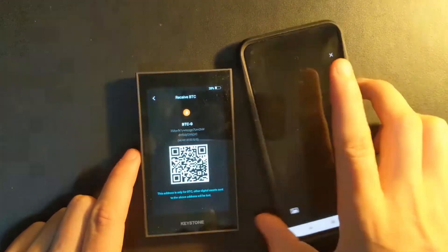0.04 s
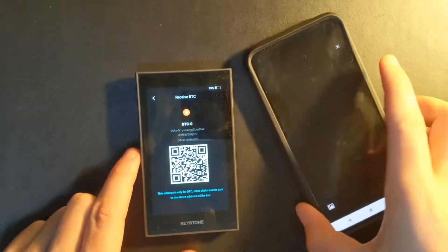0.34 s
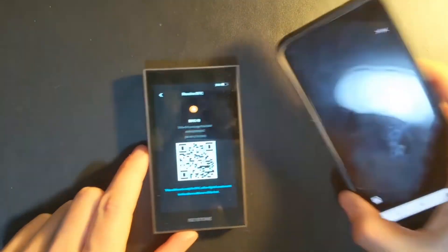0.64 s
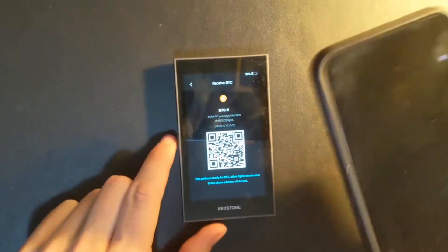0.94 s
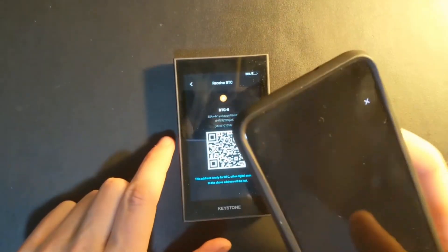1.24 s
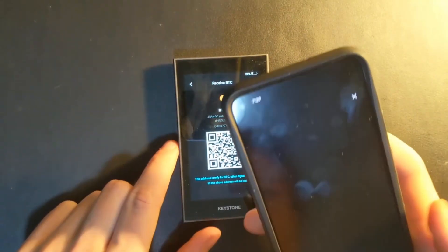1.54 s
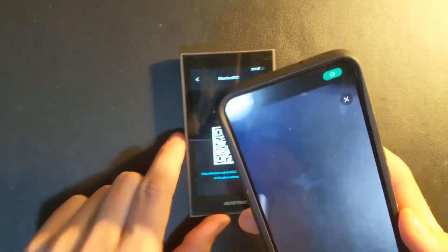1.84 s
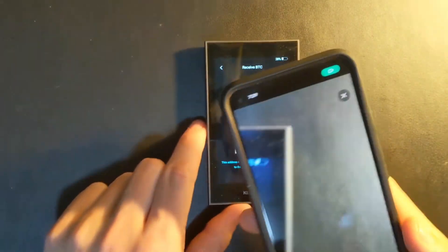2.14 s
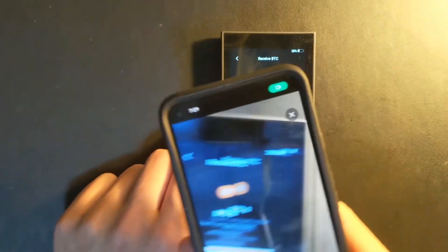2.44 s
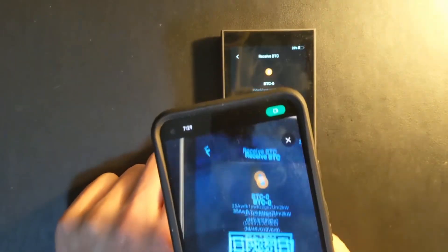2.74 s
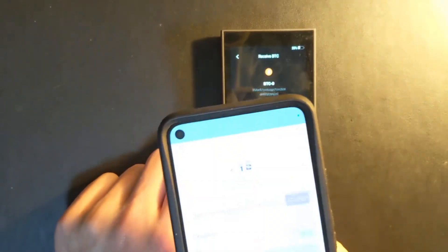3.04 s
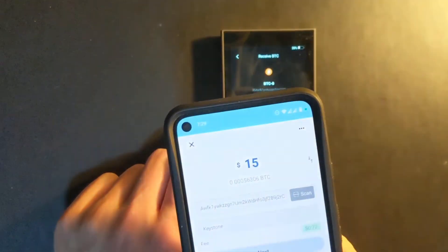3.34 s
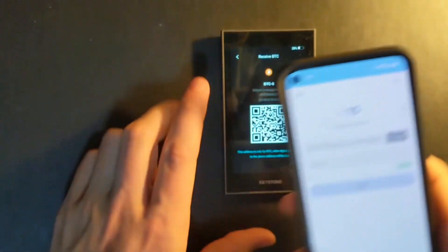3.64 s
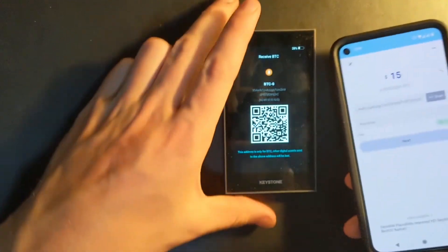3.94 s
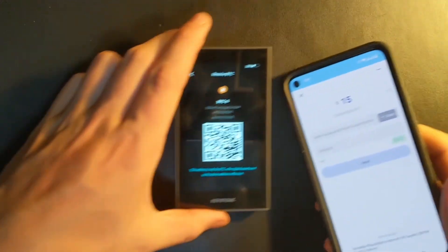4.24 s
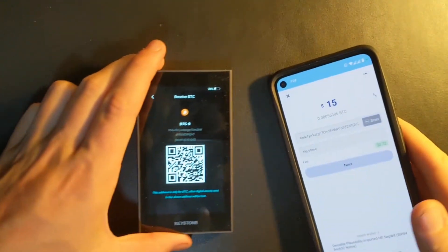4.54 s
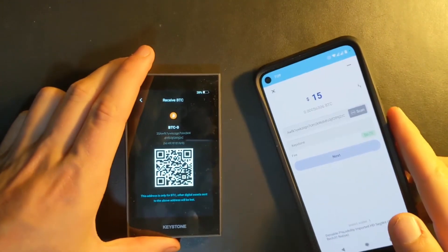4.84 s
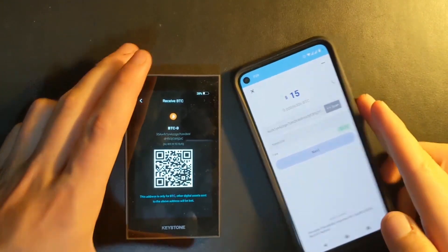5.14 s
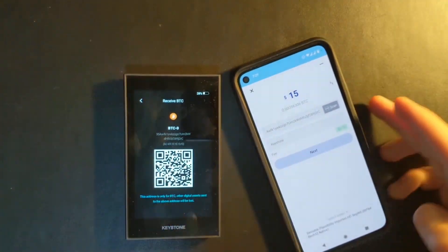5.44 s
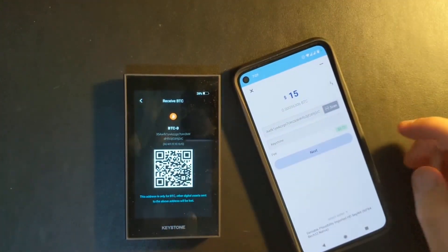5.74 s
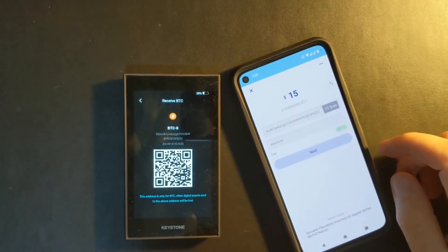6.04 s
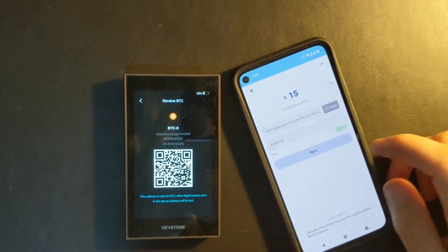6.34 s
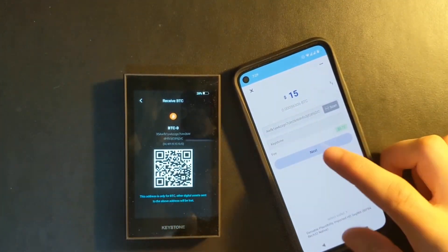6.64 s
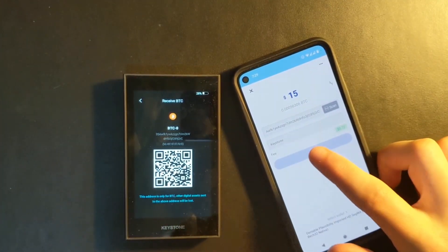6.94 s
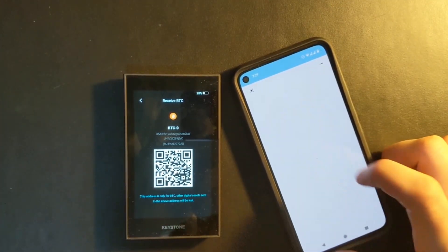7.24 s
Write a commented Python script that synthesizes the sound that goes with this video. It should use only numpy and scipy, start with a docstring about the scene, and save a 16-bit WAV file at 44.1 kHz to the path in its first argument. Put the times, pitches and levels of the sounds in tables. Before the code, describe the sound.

Two hands handle a cased smartphone and a second small device on a desk, close to a stereo microphone in a small room. A soft thump and a rasping slide open the sound, with a clear knock at about 0.6 seconds and more scraping as the phone comes off the desk. The case clicks lightly in the grip from 1 to 1.8 seconds, and faint rubbing continues, with a soft bump near 2.2. After a lull, more small clicks come around 3.5 seconds. From 4 to 5 seconds there is hissy, rasping sliding with light knocks. The phone is set down with a hollow knock at 4.7 and the loudest, sharper one at 5.2. Faint finger taps follow just before 6 seconds and again around 7. Throughout, a computer fan hums quietly on the right, and the arms send a low rumble through the microphone stand.

```python
"""A cased smartphone is slid off a desk, held, set down with two knocks and tapped, while a second small
device is nudged about; two hands at work in a small room, close to a stereo microphone. Each contact
ticks, rings the device briefly near 1 kHz and thumps the desk top. The case clicks in the grip, and
sliding rasps and hisses with tiny slips. A computer fan hums off to the right, and the weight of the
arms rumbles through the microphone stand."""
import sys
import numpy as np
from scipy import signal
from scipy.fft import rfft, irfft
from scipy.io import wavfile
from scipy.ndimage import uniform_filter1d

SR = 44100
rng = np.random.default_rng(int(sys.argv[2]) if len(sys.argv) > 2 else 0)


def wav_record(signal):
    """Record a signal, one row per channel, as 16-bit PCM in the file named by sys.argv[1]."""
    frames = np.transpose(np.atleast_2d(signal))
    bounded = np.clip(frames, -1, 1)
    # unit amplitude maps onto the largest positive 16-bit level
    quanta = np.round(bounded * 32767).astype(np.int16)
    wavfile.write(sys.argv[1], SR, quanta)


N = 320607
TIME = np.arange(N) / SR
HIT_TIME = TIME[:SR // 2]  # seconds since a contact
LEFT_RIGHT = np.array([[1], [-1]])  # opposite signs for the two sides

# Tone colours of the noises and the room's tail. Each row: frequency in Hz, relative level in dB.
ROOM_TONE_COLOUR = [(20, -29.5), (35, -33), (55, -10), (80, -8), (140, -14), (220, -15), (400, -22.5),
                    (900, -30.5), (1300, -28.5), (2300, -31.5), (4200, -27.5), (5800, -28), (6700, -34),
                    (9700, -33.5), (13000, -39)]
FAN_COLOUR = [(100, 4), (280, -5.5), (400, -3.5), (600, -3.5), (780, -4.5), (950, -1.5), (1060, -6),
              (1200, -30.5), (2500, -28)]
TAIL_COLOUR = [(100, -13.5), (330, -1.5), (600, 5), (950, -7), (1500, 3), (3000, 2.5), (5500, 4),
               (9000, 5.5)]
RASP_COLOUR = [(70, -9.5), (130, 1.5), (190, -3), (270, -3), (450, -11.5), (750, -6.5), (930, -1),
               (1090, -4), (1230, -11.5), (1500, -10), (2000, -26.5), (6000, -38.5)]
HISS_COLOUR = [(1200, 3.5), (2600, 0), (3300, 2), (4600, -3), (5750, 0.5), (6600, -7), (7700, 0),
               (8600, -9.5), (9800, -1.5), (11000, -12.5), (11700, -4.5), (12700, -18.5), (15500, -13)]
CASE_TICK_COLOUR = [(300, -1), (600, 9), (2100, -6), (3000, 0), (4300, -12.5), (5800, -4.5), (6600, -10.5),
                    (8700, -10), (9900, 0.5), (11500, -7), (15500, -3)]
DESK_TICK_COLOUR = [(300, -12.5), (1450, 2.5), (1900, -2.5), (3100, -2), (4100, -5.5), (4700, -12),
                    (5700, -3), (6600, -15), (7600, -12), (9800, -14.5), (15500, -15)]
# Decay of the room. Each row: frequency in Hz, seconds to fall 60 dB.
ROOM_DECAY = [(200, .25), (1000, .28), (5000, .26), (15000, .22)]
# Low modes of desk top and room. Each row: frequency in Hz, relative level in dB, seconds to fall 60 dB
# (capped in desk_thump).
DESK_MODES = [(51, -3, 0.84), (81.4, -22, .12), (120.6, -3.5, 0.33), (144.7, -8, 0.16), (183.6, -5.5, 0.15),
              (246.3, -2.5, 0.15), (281.8, -8, 0.27), (374.6, -22.5, 0.28), (448, -16, 0.16),
              (504, -9, 0.06), (585, -11, 0.15)]
# A device or finger moving over a surface. Each row: start and length in seconds, relative levels of
# rasp and hiss in dB.
SLIDE_STROKES = [(0.068, 0.095, -62, -62), (0.127, 0.13, -60, -58), (0.23, 0.27, -66, -66.5),
                 (0.474, 0.08, -63, -74), (0.535, 0.048, -77, -59), (0.636, 0.2, -59, -64),
                 (0.741, 0.22, -51.5, -59.5), (1.03, 0.47, -68, -73.5), (1.62, 0.098, -61, -68),
                 (1.687, 0.35, -70, -67.5), (1.802, 0.36, -58.5, -65), (2.035, 0.51, -79, -72),
                 (2.226, 0.3, -61, -66.5), (2.662, 0.054, -69, -70.5), (3.548, 0.19, -63.5, -70.5),
                 (3.6, .46, -69, -71), (3.676, 0.1, -75, -64), (4.037, 0.62, -55.5, -60),
                 (4.172, 0.23, -67, -55.5), (4.757, 0.114, -68.5, -67.5), (4.955, 0.6, -70.5, -74),
                 (5.4, 0.31, -83, -74), (5.587, 0.41, -73.5, -79)]
# Case edge or skin sticking and slipping. Each row: start and length in seconds, first and last pitch
# in Hz, level in dB.
DRAG_STROKES = [(0.072, 0.14, 400, 810, -58), (.28, 0.16, 2000, 1700, -58.5),
                (3.675, 0.079, 3500, 2700, -70.5), (4.06, 0.066, 1450, 1200, -68),
                (4.05, 0.9, 1400, 1300, -64.5)]
# The case clicking in the grip. Each row: start in seconds, relative levels of ring and tick in dB,
# lag of the left side in ms.
CASE_CLICKS = [(1.0472, -46.5, -46, 0.78), (1.0765, -51, -66, 1), (1.101, -46.5, -54.5, 0.91),
               (1.2044, -52.5, -60.5, 0.73), (1.227, -52, -63, 0.98), (1.2698, -61.5, -65, 0.91),
               (1.6148, -49, -51, 0.85), (1.6581, -51, -55, 0.76), (1.743, -55.5, -58, .83),
               (1.7642, -57.5, -59, 0.89), (3.5216, -65.5, -62.5, -0.082), (3.5429, -65, -61, -0.2),
               (3.5817, -55, -53, -0.63), (3.61, -56, -58, -0.97), (3.6643, -63, -68, 0.088)]
# Fingers landing on case and screen. Each row: start in seconds, relative levels of ring, desk thump
# and tick in dB.
FINGER_TAPS = [(2.24, -77, -55.5, -103), (5.0939, -66.5, -77, -67.5), (5.1303, -65, -64, -77),
               (5.7482, -69, -77, -92), (5.7814, -59.5, -69, -83), (5.8607, -66, -80, -78),
               (5.9046, -61, -78, -72), (5.9382, -60.5, -75, -71.5), (6.9143, -74.5, -74, -69),
               (7.02, -69.5, -62.5, -71.5)]
# A device meeting the desk. Each row: start in seconds, relative ring level in dB, ring pitch in Hz,
# ring time constant in ms, relative levels of desk thump and tick in dB, tick cut-off in Hz, lag of the
# left side in ms.
DESK_KNOCKS = [(0.0955, -61, 836, 1.3, -43, -66.5, 5000, 0),
               (0.6196, -32.5, 927, 0.54, -41, -51.5, 3800, 0.12),
               (4.1685, -54.5, 910, 0.73, -73, -65, 5740, 0.052),
               (4.2748, -50.5, 1040, 0.33, -68, -56.5, 12000, 0.72),
               (4.286, -47.5, 805, 0.36, -46, -67, 5500, 0.077),
               (4.6719, -43.5, 1240, 0.26, -36, -50.5, 3630, 0.07),
               (4.6835, -41.5, 967, 1, -41, -55.5, 3870, 0.19),
               (4.7537, -49.5, 1010, 1.3, -49, -63.5, 3940, 0.12),
               (5.2206, -25, 942, 1.02, -27.5, -40, 8800, 0.11)]


def undb(db):
    """Decibels to gain."""
    return 10 ** (np.asarray(db) / 20)


def unit_rms(x):
    """Scale to rms 1."""
    return x / np.sqrt(np.mean(x ** 2))


def unit_attack(x):
    """Scale so that the first 10 ms have rms 1."""
    return x / np.sqrt(np.mean(x[..., :SR // 100] ** 2))


def butter(x, hz, kind="low"):
    """Gentle filter, low-pass unless told otherwise."""
    return signal.sosfilt(signal.butter(2, hz, kind, fs=SR, output="sos"), x)


def on_log(points, hz):
    """Read (Hz, value) points on a log-frequency axis."""
    point_hz, value = np.transpose(points)
    return np.interp(np.log(hz + 1), np.log(point_hz), value)


def colour(x, points, size=4096):
    """Minimum-phase filter with the given (Hz, dB) colour."""
    gain = undb(on_log(points, np.fft.rfftfreq(size, 1 / SR)))
    cepstrum = irfft(np.log(gain))
    cepstrum[1:size // 2] *= 2
    cepstrum[size // 2 + 1:] = 0
    response = irfft(np.exp(rfft(cepstrum)))
    return signal.fftconvolve(x, np.array(response, ndmin=x.ndim), axes=-1)[..., :x.shape[-1]]


def wander(rate):
    """Random drift with a spread near 1, turning rate times a second."""
    step = int(SR / rate)
    held = np.repeat(rng.standard_normal(N // step + 1), step)
    return 1.3 * uniform_filter1d(held, step)[:N]


def add(out, start_s, sound, lag_ms):
    """Mix a sound in, reaching the left of the microphone lag_ms after the right."""
    for side, part, sign in zip(out, np.broadcast_to(sound, (2, sound.shape[-1])), (1, -1)):
        start = max(int((start_s + sign * lag_ms / 2000) * SR), 0)
        side[start:start + len(part)] += part[:N - start]


def room_tone(level_db=-68):
    """Low room noise and faint hiss all round the microphone."""
    mid, side = colour(rng.standard_normal((2, N)), ROOM_TONE_COLOUR)
    side = colour(side, [(60, -4.0), (120, -9.5), (300, 9.5), (1500, -1.0)])
    return undb(level_db) * unit_rms(mid + LEFT_RIGHT * side)


def fan(rush_db=-67, lag_ms=.66, hum_hz=97, hum_db=-74):
    """A computer fan: rushing air off to the right, over a wavering hum."""
    out = np.zeros((2, N))
    rush = undb(rush_db + .23 * wander(6)) * unit_rms(colour(rng.standard_normal(N), FAN_COLOUR))
    add(out, 0, rush, lag_ms)
    hum = np.sin(2 * np.pi * hum_hz * TIME + .37 * wander(2.3)) * undb(2 * wander(60))
    return out + undb(hum_db) * unit_rms(hum)


def stand_rumble(band_hz=(7, 20), rest_db=-63, effort_db=-2):
    """The weight of the arms shakes desk and microphone stand, more while they push something along."""
    shake = unit_rms(butter(rng.standard_normal(N), band_hz, "band"))
    effort, _ = friction()
    return shake * np.hypot(undb(rest_db), undb(effort_db) * effort)


def small_room(x, echo_s=.0112, echo_db=-14, echo_treble_db=-7, tail_db=-4, alike_hz=1300):
    """Direct sound, one bright reflection and a short diffuse tail, alike on both sides in the bass."""
    hz = np.fft.rfftfreq(len(HIT_TIME), 1 / SR)
    mid, side = rfft(rng.standard_normal((2, len(HIT_TIME))))
    alike = 1 / (1 + (hz / alike_hz) ** 2)
    field = (mid * np.sqrt(1 + alike) + LEFT_RIGHT * side * np.sqrt(1 - alike)) / np.sqrt(2)
    field *= undb(on_log(TAIL_COLOUR, hz))
    octaves = np.round(2 * np.log2(np.maximum(hz, 125))) / 2  # in half-octave steps
    tail = 0
    for octave in np.unique(octaves):
        band = irfft(field * (octaves == octave), len(HIT_TIME))
        tail += band * undb(-60 * HIT_TIME / on_log(ROOM_DECAY, 2 ** octave))
    fade_in = np.clip(HIT_TIME / .002 - 1, 0, 1)
    response = tail * fade_in * undb(tail_db) / np.sqrt(SR / 50)
    response[:, 0] += 1  # direct sound
    # flat screens beam their treble up to the ceiling
    echo = int(echo_s * SR)
    response[:, echo] += undb(echo_db) + undb(echo_treble_db)
    response[:, echo + 1] -= undb(echo_treble_db)
    return signal.fftconvolve(x, response, axes=1)[:, :N]


def stroke(start, length, peak_share=.37, speed_power=.79):
    """Friction strength of one hand movement, 0-1: it speeds up from rest, peaks and slows to rest."""
    ramp = np.interp(TIME, [start, start + length * peak_share, start + length], [0, 1, 0])
    speed = np.sin(np.pi / 2 * ramp)
    return speed ** speed_power


def friction():
    """Strength of the rasp and of the hiss; overlapping strokes add in power."""
    power = sum((undb([[rasp_db], [hiss_db]]) * stroke(start, length)) ** 2
                for start, length, rasp_db, hiss_db in SLIDE_STROKES)
    return np.sqrt(power)


def micro_slips(rate):
    """Friction as dense tiny slips of unequal size, rate a second."""
    slips = rng.standard_normal(N) * (rng.random(N) < rate / SR)
    size_db = np.minimum(rng.exponential(size=N), 4)
    return unit_rms(slips * undb(size_db))


def dragging(relative_width=.25, slip_rate=2500):
    """Case edge or skin sticks and slips irregularly, the pitch gliding through the stroke."""
    out = 0
    for start, length, first_hz, last_hz, db in DRAG_STROKES:
        hz = np.interp(TIME, [start, start + length], [first_hz, last_hz])
        slips = micro_slips(slip_rate) + 1j * micro_slips(slip_rate)
        flutter = butter(slips, relative_width * (first_hz + last_hz) / 2)
        rub = np.real(flutter * np.exp(2j * np.pi * np.cumsum(hz) / SR))
        out += unit_rms(rub) * undb(db) * stroke(start, length)
    return out


def sliding(rasp_db=-1, uneven_db=3.5, body_hz=1020, body_width_hz=220):
    """Slips excite the same 1 kHz body as the knocks; the matt surface adds a fine hiss."""
    rasp_strength, hiss_strength = friction()
    pressure_db = uneven_db * wander(30)
    slips = colour(micro_slips(7600), RASP_COLOUR)
    resonance = signal.lfilter(*signal.iirpeak(body_hz, body_hz / body_width_hz, fs=SR), slips)
    rasp = unit_rms(slips + resonance) * rasp_strength * undb(rasp_db + pressure_db)
    fine_slips = np.array([micro_slips(12000) for _ in range(2)])
    hiss = unit_rms(colour(fine_slips, HISS_COLOUR)) * hiss_strength * undb(.5 * pressure_db)
    return rasp + hiss


def ring(hz, decay_ms):
    """A heavily damped ring that builds over a cycle and dies within a few."""
    age = HIT_TIME * 1000 / decay_ms
    return unit_attack(-age ** 1.64 * np.exp(-age) * np.sin(2 * np.pi * hz * HIT_TIME))


def desk_thump(push_hz=135, push_s=.0035, clunk_db=-11, modes_db=-8, longest_s=.38):
    """The desk top gives way once with a hollow clunk, then its modes ring on."""
    push = -np.sin(2 * np.pi * push_hz * HIT_TIME) * np.exp(-HIT_TIME / push_s)
    clunk = undb(clunk_db) * ring(hz=330, decay_ms=1)
    modes = 0
    for hz, db, t60 in DESK_MODES:
        phase = LEFT_RIGHT * .7 * min(hz / 240, 1) ** 2  # higher modes differ between the sides
        decay = undb(db - 60 * HIT_TIME / min(t60, longest_s))
        modes -= decay * np.sin(2 * np.pi * hz * HIT_TIME + phase)
    build_up = 1 - np.exp(-HIT_TIME / .00061)
    swing = push + clunk + undb(modes_db) * modes * build_up
    return unit_attack(butter(swing, 40, "high"))  # a panel this size radiates almost no sub-bass


def tick(tick_colour, cutoff_hz, fade_s=.0022):
    """Edges meet in a burst of tiny contacts; a softer touch loses the top."""
    burst = rng.standard_normal((2, len(HIT_TIME))) * np.exp(-HIT_TIME / fade_s)
    return unit_attack(butter(colour(burst, tick_colour), cutoff_hz))


def contacts(rows, tick_colour, ring_gain_db, thump_gain_db, tick_gain_db, lower_db, upper_db, left_db):
    """Each contact rings the device at three bending modes, ticks and pushes on whatever carries it."""
    out, thump = np.zeros((2, N)), desk_thump()
    for start, ring_db, hz, ms, thump_db, tick_db, cutoff_hz, lag_ms in rows:
        lower_mode = undb(lower_db) * ring(.57 * hz, ms)
        upper_mode = undb(upper_db) * ring(1.58 * hz, 2 * ms)
        body = undb(ring_db + ring_gain_db) * (ring(hz, ms) + lower_mode + upper_mode)
        edge = undb(tick_db + tick_gain_db) * tick(tick_colour, cutoff_hz)
        add(out, start, body + edge, lag_ms)
        # a fleshy touch, with much weight and little ring, pushes slowly and reaches only the lowest modes
        reach_hz = np.clip(560 * undb(.6 * (ring_db - thump_db)), 130, 2000)
        add(out, start, undb(thump_db + thump_gain_db) * butter(thump, reach_hz), lag_ms=0)
    return out * undb(LEFT_RIGHT * left_db / 2)


def case_clicks(ring_hz=1160, ring_ms=.66, thump_db=-63, usual_tick_db=-57):
    """The case clicks in the grip, brighter the stronger it snaps; little weight reaches the desk."""
    rows = []
    for start, ring_db, tick_db, lag_ms in CASE_CLICKS:
        cutoff_hz = 6500 * undb(.21 * (tick_db - usual_tick_db))
        rows.append((start, ring_db, ring_hz, ring_ms, thump_db, tick_db, cutoff_hz, lag_ms))
    return contacts(rows, CASE_TICK_COLOUR, ring_gain_db=3.5, thump_gain_db=1.5, tick_gain_db=3,
                    lower_db=-4.5, upper_db=-15, left_db=.5)


def knocks_and_taps(tap_hz=1120, tap_ms=.65, cutoff_hz=5700, lag_ms=.06):
    """Devices knock on the desk; fingers tap the phone, all with one pitch, softness and place."""
    taps = [(start, ring_db, tap_hz, tap_ms, thump_db, tick_db, cutoff_hz, lag_ms)
            for start, ring_db, thump_db, tick_db in FINGER_TAPS]
    return contacts(DESK_KNOCKS + taps, DESK_TICK_COLOUR, ring_gain_db=2.5, thump_gain_db=4.5,
                    tick_gain_db=6, lower_db=-21, upper_db=-21, left_db=-.1)


def scene():
    """The handling reaches the microphone through the room, over rumble, room tone and fan."""
    handling = knocks_and_taps() + case_clicks() + sliding() + dragging()
    return small_room(handling) + stand_rumble() + room_tone() + fan()


def record(dry):
    """The recorder cuts the top steeply above 15.8 kHz."""
    return signal.sosfilt(signal.ellip(10, .2, 70, 15800, fs=SR, output="sos"), dry)


dry = scene()
out = record(dry)
wav_record(out)
```